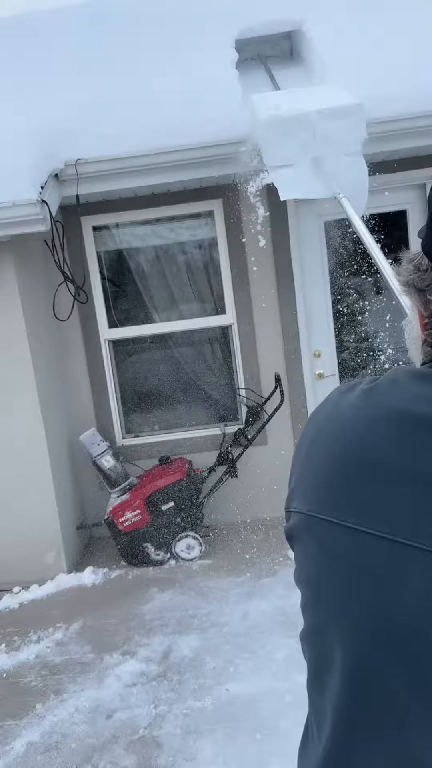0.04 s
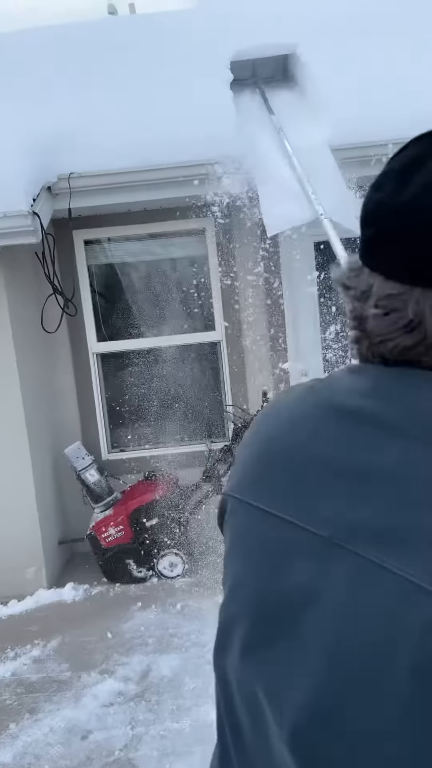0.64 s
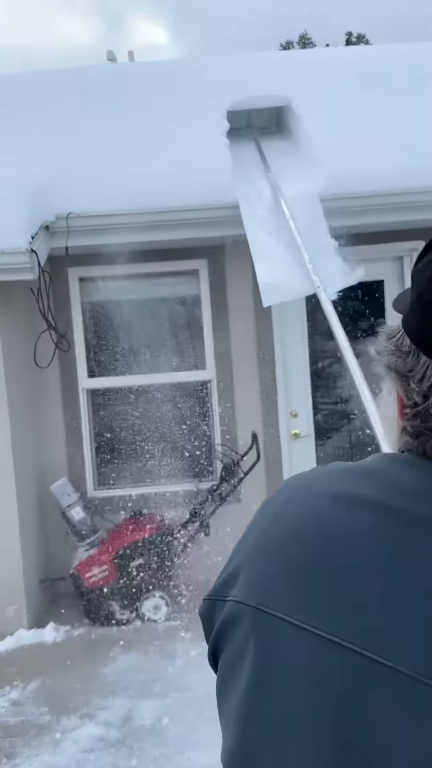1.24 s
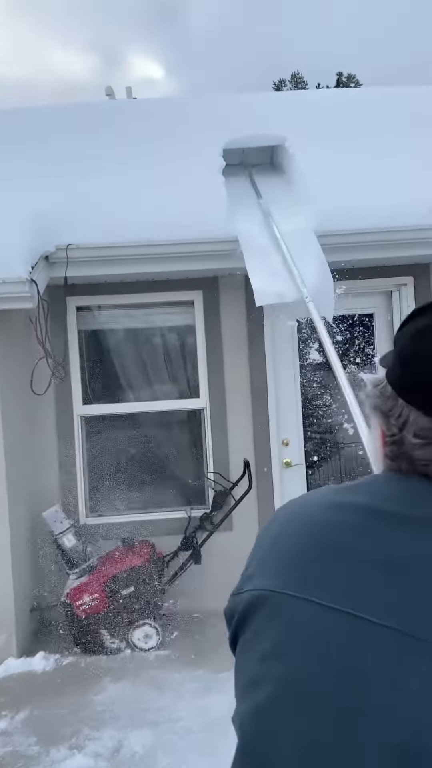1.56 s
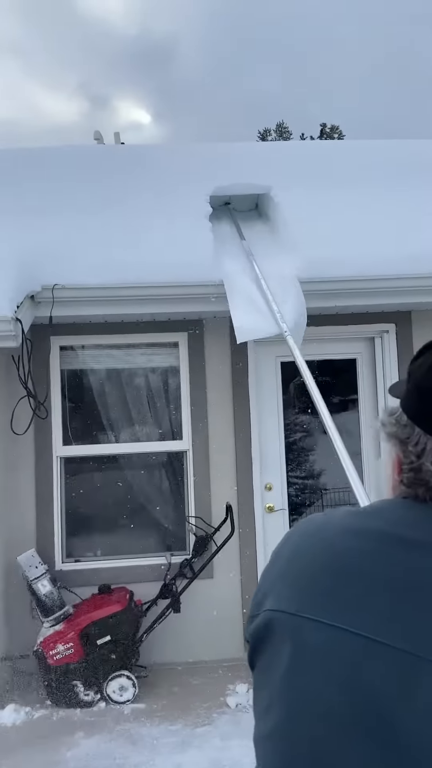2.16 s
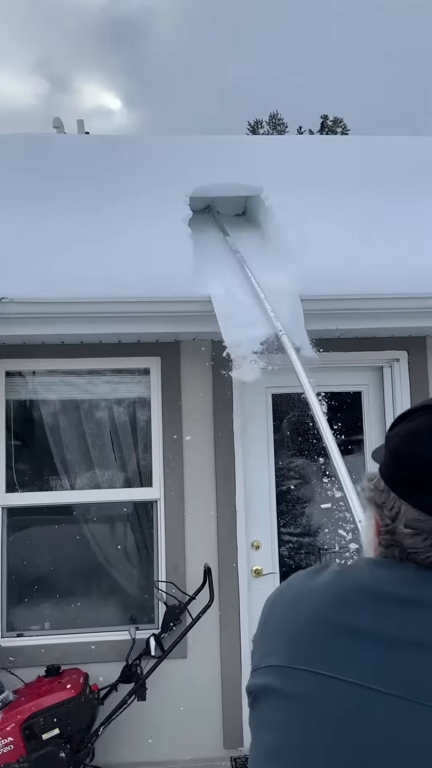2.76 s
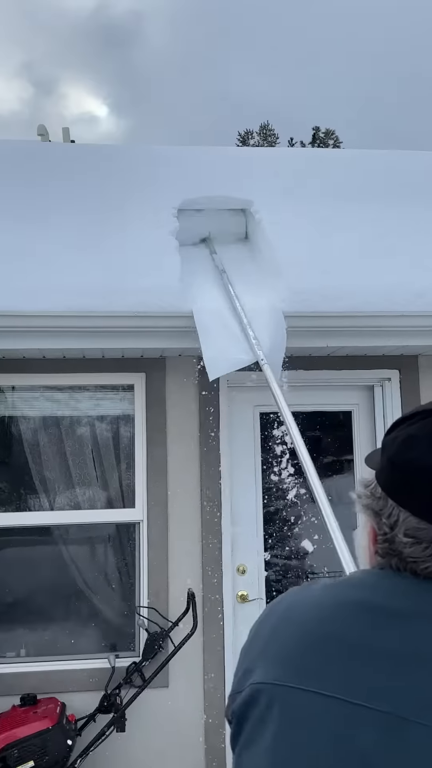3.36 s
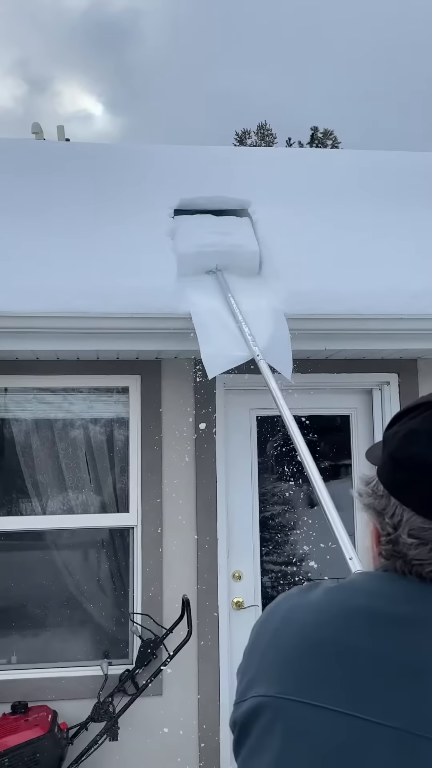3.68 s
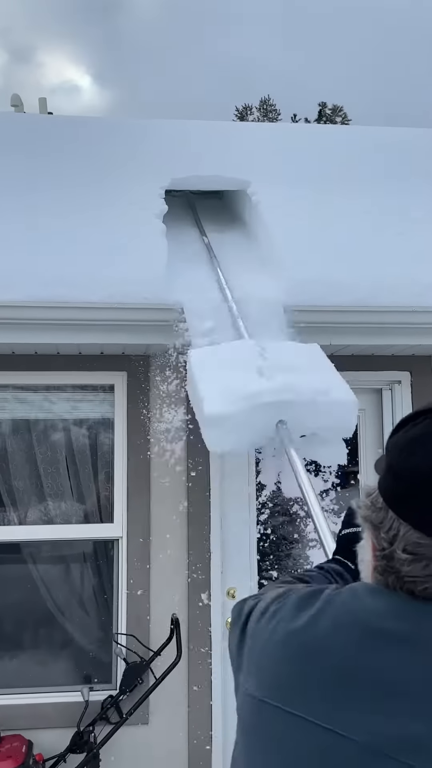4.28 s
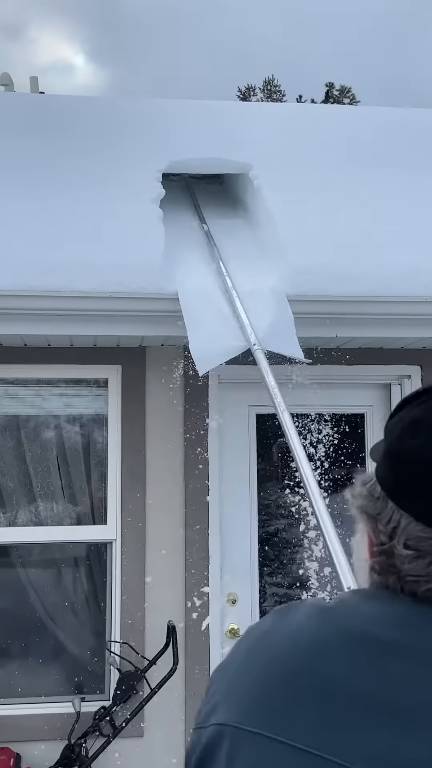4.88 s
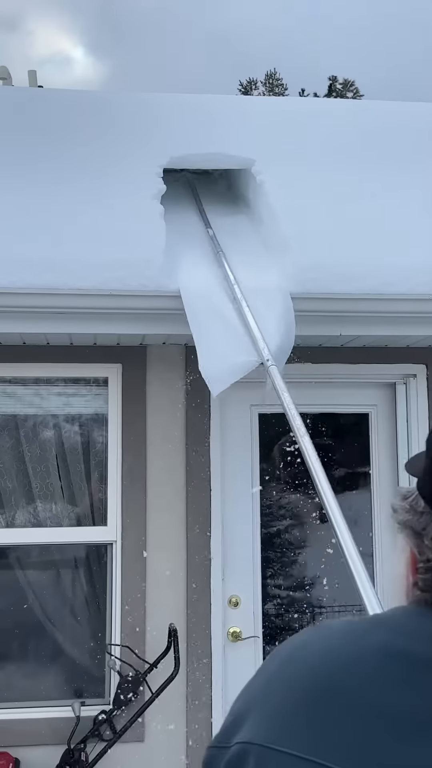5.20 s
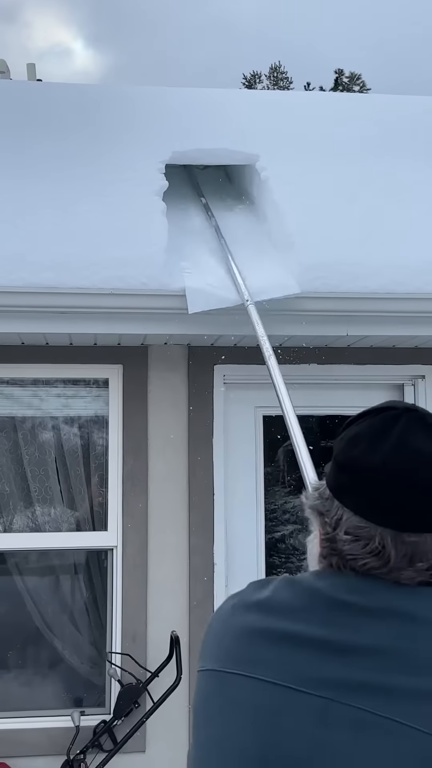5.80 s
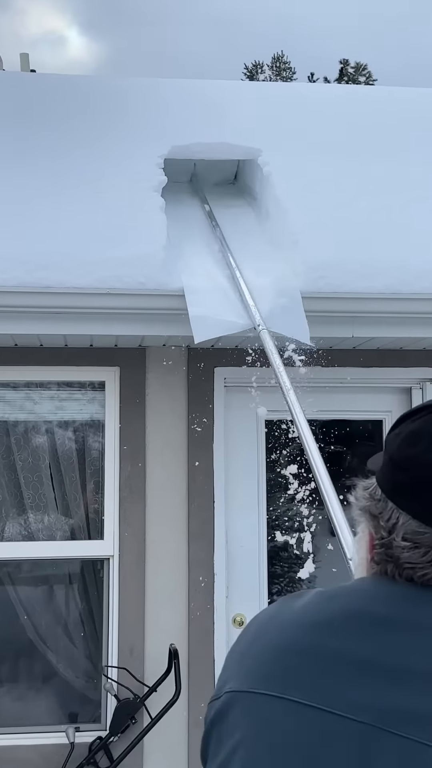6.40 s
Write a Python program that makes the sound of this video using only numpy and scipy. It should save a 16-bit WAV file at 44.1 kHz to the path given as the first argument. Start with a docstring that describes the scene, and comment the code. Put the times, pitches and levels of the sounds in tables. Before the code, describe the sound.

A roof rake cuts snow that slides off with a grainy swish and drops with deep thuds, while wind rumbles faintly.

```python
"""A roof rake on a long pole cuts snow beside a house; light wind rumbles on a two-port microphone.
First a crumb pops on the microphone, the rake sticks and slips with a groan, and snow swishes down a
plastic sheet. Near 0.75 s a slab lands with a crunch and deep thuds; powder hisses after it.
Further runs scrape down the sheet as lumps and crumbs fall. A second big landing comes at 4.7 s,
then weaker runs to the end."""
import sys
import numpy as np
from scipy import signal
from scipy.fft import rfft, irfft, next_fast_len
from scipy.io import wavfile

SR = 44100
rng = np.random.default_rng(int(sys.argv[2]) if len(sys.argv) > 2 else 0)


def inscribe(sig):
    """Save sig as 16-bit PCM at rate SR to the path in sys.argv[1].

    A 1-D sig is mono; a 2-D sig holds one channel per row.
    Samples are clipped to [-1, 1] before scaling.
    """
    pcm = np.round(np.clip(np.atleast_2d(sig).T, -1, 1) * 32767)
    wavfile.write(sys.argv[1], SR, pcm.astype(np.int16))


N = 293265
TIME = np.arange(N) / SR


def gain_of(db):
    """Decibels to amplitude."""
    return 10 ** (np.asarray(db) / 20)


def unit_rms(x):
    """Scales to rms 1."""
    return x / np.sqrt(np.mean(x ** 2) + 1e-20)


def at_hz(points, hz):
    """Interpolates a table on a log-frequency axis."""
    knots_hz, values = np.transpose(points)
    return np.interp(np.log(hz + 1), np.log(knots_hz + 1), values)


def add(mix, start_s, sound):
    """Mixes a sound in at start_s."""
    part = mix[..., max(round(start_s * SR), 0):][..., :sound.shape[-1]]
    part += sound[..., :part.shape[-1]]


def drift(rate_hz, size=N):
    """Smooth random curve, rms 1, up to about rate_hz."""
    hz = np.fft.rfftfreq(size, 1 / SR)
    spectrum = rfft(rng.standard_normal(size)) * np.exp(-(hz / rate_hz) ** 2) * (hz > 0)
    return unit_rms(irfft(spectrum, size))


def swell(t, rise_s, decay_s):
    """Quarter-sine rise to 1, exponential decay."""
    return np.sin(np.pi / 2 * np.minimum(t / rise_s, 1)) * np.exp(-np.maximum(t - rise_s, 0) / decay_s)


def hump(hz, centre_hz, width_hz):
    """Gain of one resonance."""
    return hz / (hz + 40) / (1 + ((hz - centre_hz) / (width_hz / 2)) ** 2)


def resonate(x, hz, width_hz):
    """Resonance that follows the curve hz; rms 1."""
    carrier = np.exp(2j * np.pi * np.cumsum(hz) / SR)
    pole = np.exp(-np.pi * width_hz / SR)
    return unit_rms((carrier * signal.lfilter([1], [1, -2 * pole, pole * pole], x / carrier)).real)


def at_ports(pair, colour):
    """Colours two independent noises and blends them into the two port signals; rms 1."""
    # likeness of the ports: freq_hz, coherence
    likeness = [(60, .99), (290, .94), (750, .78), (1200, .93), (1700, 1), (5800, 1), (6600, .85),
                (9000, .82), (10400, 1), (13800, 1), (15700, .6)]
    # phase between ports: freq_hz, left_lead_rad
    lead = [(100, 0), (400, .2), (780, 1), (1100, 0), (6000, 0), (6600, -.8), (8000, -1.6), (10400, -3.02),
            (13500, -3.22), (15800, -4.2)]
    # balance: freq_hz, left_minus_right_db
    tilt = [(150, 0), (380, 1), (700, 7.5), (1290, 3.5), (2380, 0), (8000, 0)]
    size = next_fast_len(pair.shape[1])
    hz = np.fft.rfftfreq(size, 1 / SR)
    direct, stray = rfft(pair, size)
    coherence = np.clip(at_hz(likeness, hz), 0, 1)
    lean = gain_of(at_hz(tilt, hz) / 2) * np.exp(.5j * at_hz(lead, hz))
    left = direct * lean
    right = (coherence * direct + np.sqrt(1 - coherence ** 2) * stray) / lean
    return unit_rms(irfft(np.array([left, right]) * colour(hz), size)[:, :pair.shape[1]])


def grains(per_s, spread_db, share, size=N):
    """Tiny crystal contacts merge into noise; larger single grains carry a share of the power."""
    hits = rng.random(size) < per_s / SR
    clicks = hits * gain_of(spread_db * np.minimum(rng.exponential(1, size), 4))
    return rng.standard_normal((2, size)) * np.sqrt(1 - share + share * unit_rms(clicks) ** 2)


def run_down(start_s, length_s, end_db, build_db, onset_s=0.098, run_out_s=0.052):
    """Gain of one run of snow: gets going, ramps by build_db, dies away once off the sheet."""
    t = TIME - start_s
    onset = np.sin(np.pi / 2 * np.clip(t / onset_s + 0.39, 0, 1)) ** 2
    progress = np.clip(t / length_s, 0, 1)
    run_out = np.exp(-np.maximum(t - length_s, 0) / run_out_s)
    return onset * gain_of(end_db - build_db * (1 - progress)) * run_out


def drone(level_db=-54, centre_hz=122, width_hz=14):
    """Faint, steady, distant hum."""
    noise = rng.standard_normal((2, N))
    return gain_of(level_db) * at_ports(noise, lambda hz: hump(hz, centre_hz, width_hz))


def wind(buffet_db=2.5):
    """Wind on the microphone: a low, lumpy rumble that follows the gusts."""
    # rumble spectrum: freq_hz, level_db
    spectrum = [(18, -34), (30, -8), (45, 8), (62, 3.5), (95, -7), (160, -5.5), (250, -3.5), (500, -8),
                (1500, -34), (6000, -65)]
    # gusts: time_s, level_db
    gusts = [(0.1, -39.5), (0.35, -45), (0.7, -32), (1.3, -54.5), (1.9, -51.5), (2.9, -52), (3.55, -51.5),
             (4.3, -48), (4.85, -45.5), (5.2, -45.5), (5.95, -52.5), (6.65, -54.5)]
    air = at_ports(rng.standard_normal((2, N)), lambda hz: gain_of(at_hz(spectrum, hz)))
    return air * gain_of(np.interp(TIME, *np.transpose(gusts)) + buffet_db * drift(rate_hz=9.4))


def yard(x, echo_db=-21, decay_s=0.016):
    """Wall and ground add a faint, short echo, different at each port."""
    t = np.arange(SR // 5) / SR
    tail = unit_rms(rng.standard_normal((2, len(t))) * np.exp(-t / decay_s)) / np.sqrt(len(t))
    return x + gain_of(echo_db) * signal.oaconvolve(x, tail, axes=1)[:, :N]


def shoulder(x, echo_db=-7, folds_db=-6, shade=0.19, shift_hz=0.59, taps=1000):
    """A moving shoulder's reflection combs the hiss; shifting jacket folds scatter it."""
    # reflection path: time_s, strength, left_delay_ms, right_delay_ms
    path = [(0.1, 1, 0.46, 0.31), (0.55, 1, 0.5, 0.39), (1.0, 1, 0.51, 0.38), (1.25, 0.9, 0.33, 0.27),
            (1.45, .7, 0.34, 0.25), (1.58, 1, 0.4, 0.29), (2.15, 1, 0.38, 0.25), (2.55, 0.43, 0.31, 0.25)]
    # reflected and scattered bands: freq_hz, gain_db
    echo_band = [(500, -30), (1000, -16), (2000, -8), (2600, 0), (5200, 0), (6200, -20), (9000, -70)]
    fold_band = [(400, -25), (950, -1), (1700, -6), (2600, 0), (5200, 0), (6200, -20), (9000, -70)]
    size = next_fast_len(N + taps)
    hz, spectrum = np.fft.rfftfreq(size, 1 / SR), rfft(x, size)
    near = irfft(spectrum * gain_of(at_hz(echo_band, hz)), size)[:, :N]
    folded = irfft(spectrum * gain_of(at_hz(fold_band, hz)), size)[:, :N]
    times_s, *columns = np.transpose(path)
    strength, *delays_ms = [np.interp(TIME, times_s, column) for column in columns]
    echo = np.array([np.interp(TIME - ms / 1000, TIME, port) for port, ms in zip(near, delays_ms)])
    folds = rng.standard_normal((2, taps)) + 1j * rng.standard_normal((2, taps))
    scatter = signal.oaconvolve(folded, folds / np.sqrt(taps), axes=1)[:, :N]
    scatter = (scatter * np.exp(2j * np.pi * shift_hz * TIME)).real
    return x + strength * (gain_of(echo_db) * echo + gain_of(folds_db) * scatter - shade * near)


def knock(left_db=-14, sink_s=0.0023):
    """A flying crumb hits the right port: a tiny pop of falling pitch."""
    # crumb impact: start_s, level_db, first_hz, last_hz, rise_s, decay_s
    impact = (0.1, -18, 2600, 150, .0017, .0013)
    start_s, level_db, first_hz, last_hz, rise_s, decay_s = impact
    out, t = np.zeros(N), np.arange(SR // 8) / SR
    hz = last_hz + (first_hz - last_hz) * np.exp(-t / sink_s)
    pop = np.sin(2 * np.pi * np.cumsum(hz) / SR) * swell(t, rise_s, decay_s)
    add(out, start_s, gain_of(level_db) * pop)
    return out * np.array([[-gain_of(left_db)], [1]])


def patter(per_s=55, large_hz=58.2, small_hz=254, small_db=-8, spread_db=1.5, decay_cycles=1.5):
    """Crumbs land at random as soft bumps; small ones are higher and weaker."""
    # crumb showers: middle_s, level_db, half_length_s
    showers = [(0.45, -41.5, 0.18), (0.857, -40, 0.062), (1.152, -42, 0.36), (1.846, -55, 0.24),
               (2.343, -47, 0.14), (2.98, -42, 0.051), (3.28, -34.5, 0.099), (4.8, -34.5, .15),
               (5.6, -41, 0.069), (6.425, -47.5, 0.17)]
    out, t = np.zeros(N), np.arange(SR // 8) / SR
    pitches_hz = np.geomspace(large_hz, small_hz, num=12)
    for smallness, hz in zip(np.linspace(0, 1, len(pitches_hz)), pitches_hz):
        lands = rng.random(N) < per_s / len(pitches_hz) / SR
        hits = lands * gain_of(spread_db * rng.uniform(-1.2, 1, N))
        bump = np.sin(2 * np.pi * hz * t) * swell(t, 1 / hz, decay_cycles / hz)
        out += gain_of(small_db * smallness) * signal.oaconvolve(hits, bump)[:N]
    envelope = sum(gain_of(db) * np.exp(-((TIME - mid_s) / half_s) ** 2) for mid_s, db, half_s in showers)
    return unit_rms(out) * envelope


def groans(wander=0.0714, rough=0.42, subharmonic=0.375, sag_per_s=0.71, pan_db=1.2):
    """The rake sticks and slips on the snow, slowing a little; slips alternate strong and weak."""
    # judders: start_s, level_db, pitch_hz
    judders = [(0.169, -16, 356), (0.588, -27.5, 478), (0.622, -34, 544), (0.669, -30.5, 502),
               (1.016, -37, 540), (4.727, -29, 480), (4.832, -38, 495), (5.014, -38, 519),
               (5.381, -37, 518), (5.437, -37, 732), (5.452, -40, 471)]
    rise_s, decay_s = 0.016, 0.025
    out, t = np.zeros(N), np.arange(SR // 3) / SR
    for start_s, level_db, pitch_hz in judders:
        jitter = 1 + wander * drift(rate_hz=210, size=len(t))
        hz = pitch_hz * np.exp(-sag_per_s * (t - rise_s)) * jitter
        phase = 2 * np.pi * np.cumsum(hz) / SR
        slips = np.sin(phase) * (1 + rough * drift(rate_hz=280, size=len(t)))
        slips += subharmonic * np.sin(phase / 2)
        add(out, start_s, gain_of(level_db) * slips * swell(t, rise_s, decay_s))
    return out * gain_of([[pan_db], [-pan_db]])


def scrape(flutter_db=0.46):
    """Slabs and the rake's frame rub the plastic: a hollow, grainy rasp whose pitch follows speed."""
    # rubs: start_s, length_s, end_db, build_db, first_hz, last_hz, width_hz, uncorrelated_share
    rubs = [(0.156, .25, -32.5, 14, 2100, 2520, 1100, 0.37), (1.06, .22, -36, 7, 1800, 2960, 1250, 0.74),
            (1.28, 0.094, -34.5, 7, 2890, 3300, 1400, 0.8), (1.525, 0.81, -49.5, -1, 2860, 3500, 1090, 0.4),
            (1.7, 0.89, -49, 4, 5930, 6060, 600, 0.1), (2.2, 0.77, -41.5, 6, 1210, 1470, 900, 0),
            (2.545, 0.21, -32, 15, 1700, 1980, 700, 0), (3.637, 0.41, -36, 12, 1480, 1150, 800, 0.1),
            (4.063, 0.27, -34.5, 4, 1300, 1360, 565, 0), (3.92, .2, -37, 0, 1880, 2100, 1200, 0),
            (4.15, .21, -32, 7, 2200, 3300, 1500, 0)]
    rasp = at_ports(grains(per_s=450, spread_db=-0.5, share=0.16), np.ones_like)
    stray, out = rng.standard_normal((2, N)), np.zeros((2, N))
    for start_s, length_s, end_db, build_db, first_hz, last_hz, width_hz, uncorrelated in rubs:
        friction = np.sqrt(1 - uncorrelated) * rasp + np.sqrt(uncorrelated) * stray
        hz = np.interp(TIME, [start_s, start_s + length_s], [first_hz, last_hz])
        out += resonate(friction, hz, width_hz) * run_down(start_s, length_s, end_db, build_db)
    return out * gain_of(flutter_db * drift(rate_hz=51))


def crunches(min_width_hz=120, rise_share=0.3):
    """Packed snow gives way in short bursts of coarse grains."""
    # fractures: start_s, level_db, centre_hz, decay_s
    fractures = [(0.174, -27, 230, 0.042), (0.180, -28.5, 950, 0.03), (0.413, -20, 950, 0.023),
                 (0.535, -26.5, 770, 0.038), (0.716, -25, 700, 0.0031), (0.748, -16.5, 700, 0.0055),
                 (0.752, -19, 131, 0.023), (0.85, -31, 440, 0.02), (1.847, -36.5, 2010, 0.0061),
                 (3.20, -34.5, 200, .08), (3.962, -32, 1110, 0.031), (4.09, -30.5, 990, 0.04),
                 (4.275, -30.5, 900, 0.03), (4.572, -27.5, 770, 0.042), (4.605, -27.5, 410, 0.062),
                 (4.686, -25, 190, 0.026), (4.696, -31, 4500, 0.011), (4.774, -29.5, 5650, 0.014),
                 (4.79, -36.5, 220, 0.08), (4.960, -35, 1240, 0.005), (4.962, -36, 3200, 0.0043),
                 (5.319, -35.5, 1900, 0.0041), (5.391, -49, 600, 0.041), (5.866, -37, 3900, 0.021),
                 (5.878, -39.5, 600, 0.0073)]
    out, t = np.zeros((2, N)), np.arange(SR // 2) / SR
    for start_s, level_db, centre_hz, decay_s in fractures:
        coarse = grains(per_s=660, spread_db=5.0, share=0.17, size=len(t))
        burst = at_ports(coarse, lambda hz: hump(hz, centre_hz, min_width_hz + centre_hz))
        add(out, start_s, gain_of(level_db) * burst * swell(t, rise_share * decay_s, decay_s))
    return out


def thuds(settle_s=0.0042, sag=0.26, sag_s=0.0094, rise_cycles=1.11, slap_db=-15):
    """A lump flattens on landing, so its pitch sinks fast to a deep boom; crumbs add a dull slap."""
    # landings: start_s, level_db, first_hz, last_hz, decay_s
    landings = [(0.275, -28, 150, 61.7, 0.042), (0.553, -26.5, 200, 65, 0.026),
                (0.718, -12.5, 232, 142, 0.014), (0.728, -8, 125, 61, 0.014), (0.755, -3, 125, 68, 0.023),
                (0.85, -21.5, 457, 74, 0.014), (0.908, -30, 130, 55.4, .03), (1.569, -34, 376, 70, .017),
                (2.058, -31, 159, 56, 0.015), (2.113, -33.5, 455, 100, .014),
                (2.313, -33.5, 200, 55, 0.025), (2.511, -33, 262, 105, 0.014), (2.767, -28, 111, 61, 0.042),
                (2.844, -23, 300, 130, 0.008), (2.851, -21.5, 110, 59, 0.018),
                (2.947, -33, 150, 60.5, 0.013), (2.995, -33, 260, 79.5, 0.016),
                (3.188, -29.5, 220, 141, 0.011), (3.217, -24.5, 310, 80, 0.028),
                (3.284, -25, 280, 105, 0.02), (3.885, -21.5, 115, 58.6, 0.026), (4.32, -31, 248, 65, 0.011),
                (4.601, -26.5, 202, 71, 0.039), (4.669, -21, 332, 90, 0.011), (4.697, -10, 170, 140, 0.006),
                (4.712, -15.5, 110, 60, 0.045), (4.731, -22.5, 260, 114, .016),
                (4.774, -24, 302, 140, .018), (4.824, -27.5, 157, 61.4, 0.044),
                (5.086, -23, 334, 84, 0.008), (5.614, -29, 260, 61, 0.059), (5.694, -30, 109, 53, 0.012),
                (6.177, -31.5, 300, 62, 0.016), (6.568, -29, 410, 68.5, 0.019)]
    out, t = np.zeros(N), np.arange(SR // 3) / SR
    slap_band = signal.butter(4, [70, 360], "bandpass", fs=SR, output="sos")
    for start_s, level_db, first_hz, last_hz, decay_s in landings:
        hz = last_hz * (1 + sag * np.exp(-t / sag_s)) + (first_hz - last_hz) * np.exp(-t / settle_s)
        hz *= 1 + 0.15 * drift(rate_hz=90, size=len(t))
        boom = np.sin(2 * np.pi * np.cumsum(hz) / SR) * swell(t, rise_cycles / first_hz, decay_s)
        slap = unit_rms(signal.sosfilt(slap_band, rng.standard_normal(len(t))))
        slap *= gain_of(slap_db) * swell(t, rise_s=0.0019, decay_s=0.0069)
        add(out, start_s, gain_of(level_db) * (boom + slap))
    return out


def flow(brighten_db=2, spray_swish_db=-2):
    """Gains of low swish, high swish, powder and slab: trickle, runs and sprays add in power."""
    # steady trickle of loose snow: swish_db, powder_rel_db, slab_rel_db
    trickle = (-47, -3.5, -1.9)
    # runs down the sheet: start_s, length_s, end_db, build_db, powder_rel_db, slab_rel_db, tilt_db
    runs = [(0.034, 0.36, -27, 15, -2.5, -5, -2), (0.462, 0.46, -42.5, -3.5, -1.5, 1, -0.5),
            (0.94, 0.37, -32.5, 6.5, -1.5, -8.5, -2.5), (1.3, .12, -32, 2, -3, -10.5, -0.5),
            (1.462, 0.26, -41.5, 0, -0.5, 0, -1.5), (1.717, 0.61, -42, 7, -3, -6, -2.5),
            (2.16, 0.4, -32, 7.5, -5, -9, -0.5), (2.563, 0.24, -31, 0.5, -4, -7, -1),
            (2.8, 0.12, -35.5, 2, -1, -4, 0), (2.937, 0.47, -39, -1, -3, -5, -0.5),
            (3.404, 0.26, -37, -1.5, -5.5, -14, 1.5), (3.605, 0.2, -30.5, 5, -7, -6, -1.5),
            (3.825, 0.555, -30.7, .5, -5.5, -7.5, -1), (4.422, 0.31, -36, -1.5, -4, -2, -1.5),
            (4.764, 0.19, -47.5, -4, -0.5, 3, -2), (5.278, 0.35, -41, 8.5, 0.5, -2.5, -1.5),
            (5.59, 0.15, -43.5, -2.5, 2.5, -1.5, 1.5), (5.81, 0.53, -44.5, -2, 0.5, -4, 0.5),
            (6.363, 0.58, -36.5, 2, -0.5, -14, 2)]
    # powder thrown off the edge: middle_s, level_db, half_length_s
    sprays = [(0.402, -27.5, 0.067), (0.956, -37, 0.43), (1.277, -31, 0.026), (1.59, -40.5, 0.023),
              (3.715, -32.5, 0.076), (4.335, -29.5, .065), (5.583, -39, 0.083)]
    swish_db, powder_db, slab_db = trickle
    power = gain_of(swish_db + np.array([[0], [0], [powder_db], [slab_db]])) ** 2 * np.ones(N)
    for start_s, length_s, end_db, build_db, powder_db, slab_db, tilt_db in runs:
        run = run_down(start_s, length_s, end_db, build_db)
        progress = np.clip((TIME - start_s) / length_s, 0, 1)
        tilt = gain_of(tilt_db + brighten_db * (progress - .5))  # faster snow hisses higher
        power += np.array([run / tilt, run * tilt, run * gain_of(powder_db), run * gain_of(slab_db)]) ** 2
    for middle_s, level_db, half_s in sprays:
        cloud = gain_of(level_db) * np.exp(-((TIME - middle_s) / half_s) ** 2)
        power[1:3] += np.array([cloud * gain_of(spray_swish_db), cloud]) ** 2
    return np.sqrt(power)


def sliding_snow(split_hz=2400, top_hz=10200, swish_db=2.14, powder_db=2.5, slab_db=0.5):
    """Snow rubs along the sheet in small surges: a swish, powder above it, the slab's weight below."""
    # spectra of the three parts: freq_hz, level_db
    swish_curve = [(150, -21), (600, -10.5), (1200, -1.5), (1800, -0.5), (2600, -1), (3400, -2.5),
                   (4500, -2.5), (6000, -10), (9000, -15)]
    powder_curve = [(2500, -25), (4300, -9), (5300, -2.5), (6500, 0), (7600, -1.7), (9000, -6),
                    (9900, -8.2), (11200, -5.2), (13000, -8), (15700, -9)]
    slab_curve = [(60, -3.5), (160, -5), (300, -3.5), (520, 1), (850, -1.5), (1200, -7.5), (2000, -15)]
    # level of the hiss above 10 kHz over time: time_s, gain_db
    top_hiss_levels = [(0.2, -18), (1.6, -9.5), (2.6, -44), (3.4, 2.5), (4.2, -5), (4.75, 12), (5.4, 2),
                       (6.5, 1.5)]
    surge_db, lumpy_db = 0.84, 1.5
    low_gain, high_gain, powder_gain, slab_gain = flow()

    def rub(curve, **grain):
        return at_ports(grains(**grain), lambda hz: gain_of(at_hz(curve, hz)))

    swish = rub(swish_curve, per_s=2500, spread_db=2.0, share=0.19)
    low = signal.sosfiltfilt(signal.butter(2, split_hz, fs=SR, output="sos"), swish)
    swish = (low * low_gain + (swish - low) * high_gain) * gain_of(swish_db)
    powder = rub(powder_curve, per_s=4000, spread_db=3.0, share=0.26)
    top_hiss = signal.sosfiltfilt(signal.butter(4, top_hz, "highpass", fs=SR, output="sos"), powder)
    powder += top_hiss * (gain_of(np.interp(TIME, *np.transpose(top_hiss_levels))) - 1)
    powder *= powder_gain * gain_of(powder_db)
    slab = rub(slab_curve, per_s=500, spread_db=2, share=0.42)
    slab *= slab_gain * gain_of(slab_db + lumpy_db * drift(rate_hz=25))
    return (swish + powder + slab) * gain_of(surge_db * drift(rate_hz=19.0))


def scene():
    """Snow and rake with their reflections, over wind and hum."""
    snow = shoulder(sliding_snow() + scrape() + crunches())
    landings_and_rake = yard(thuds() + patter() + groans())
    return snow + landings_and_rake + knock() + wind() + drone()


def record(dry, open_s=0.072, low_cut_hz=36, high_cut_hz=16000):
    """The microphone opens at open_s and cuts the deepest rumble and the top treble."""
    low_cut = signal.butter(3, low_cut_hz, "highpass", fs=SR, output="sos")
    high_cut = signal.firwin(511, high_cut_hz, window=("kaiser", 9), fs=SR)
    opened = signal.sosfilt(low_cut, dry * (TIME > open_s))
    return signal.oaconvolve(opened, high_cut[None], "same")


dry = scene()
out = record(dry)
inscribe(out)
```